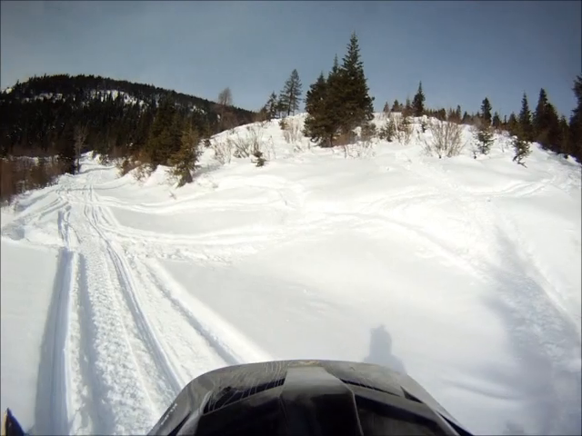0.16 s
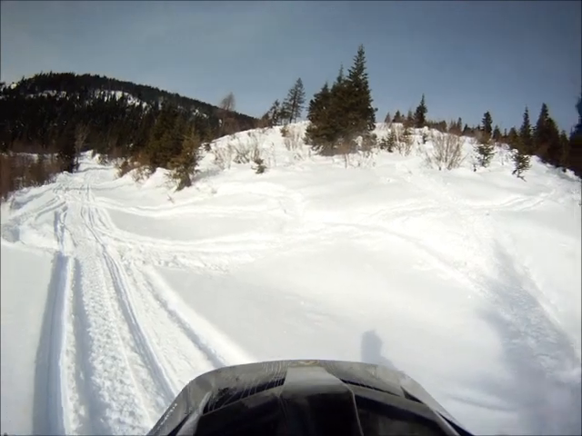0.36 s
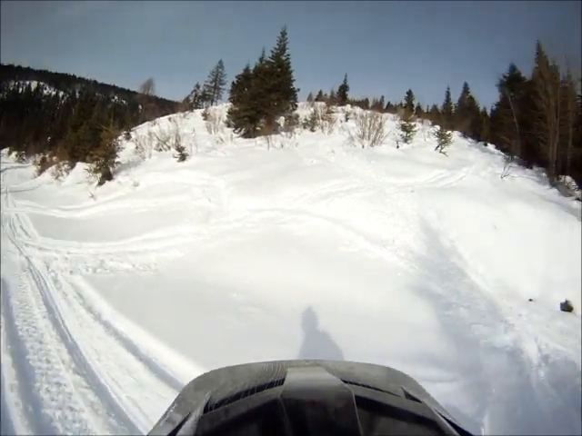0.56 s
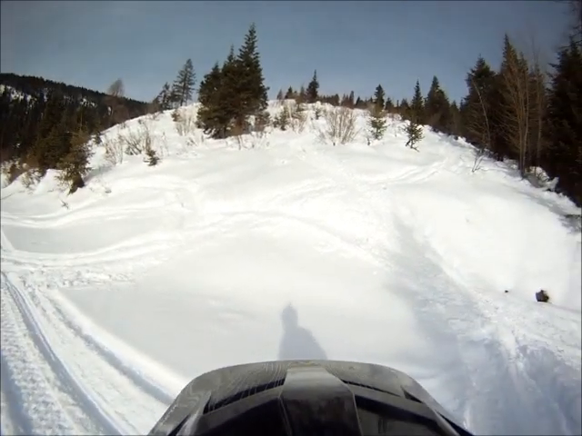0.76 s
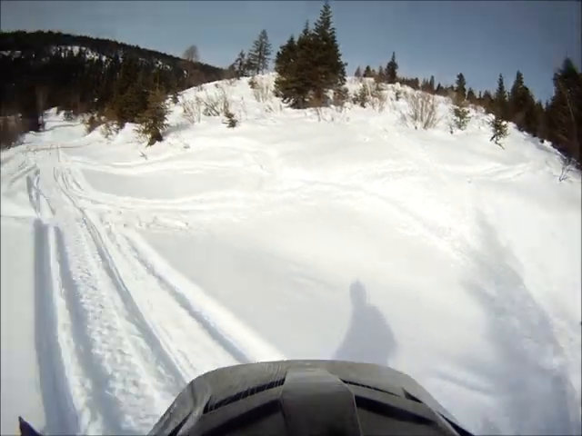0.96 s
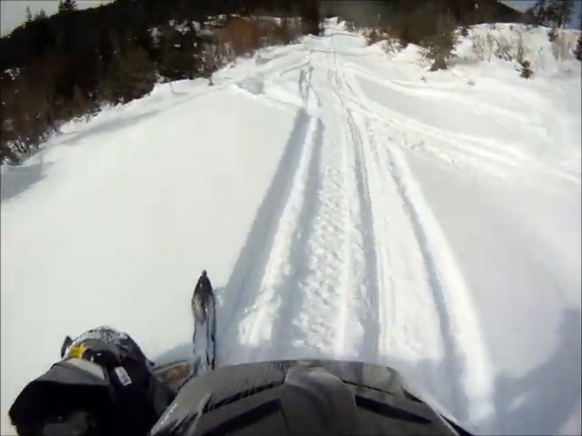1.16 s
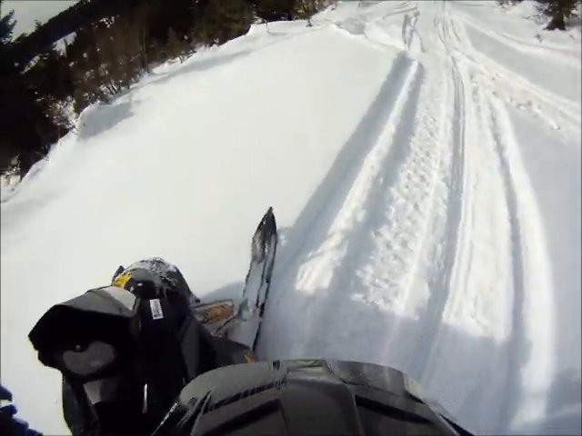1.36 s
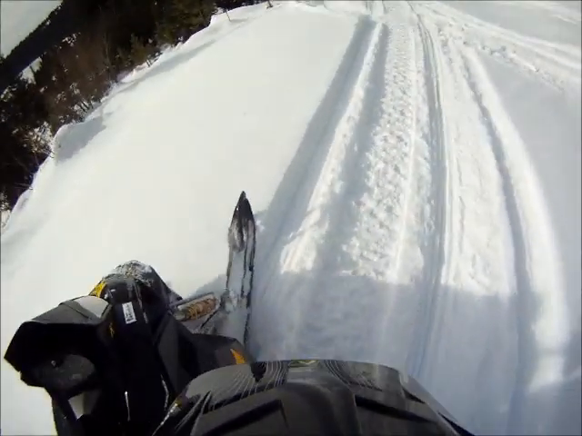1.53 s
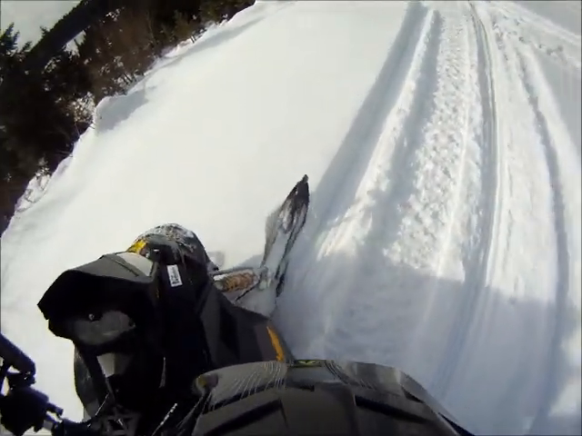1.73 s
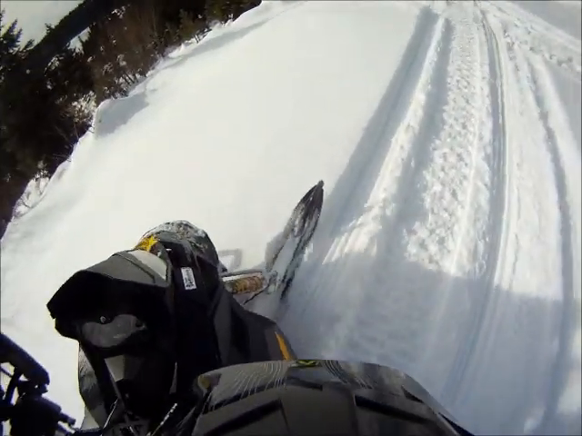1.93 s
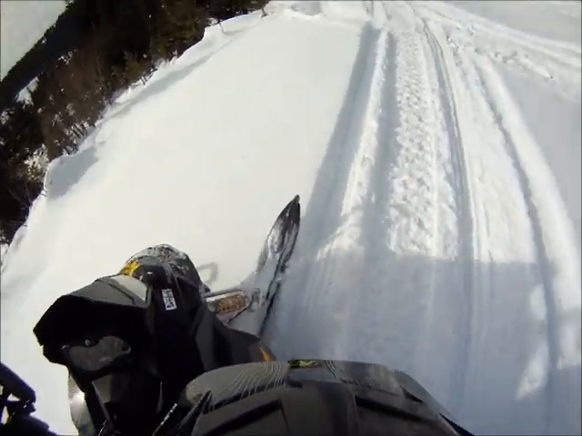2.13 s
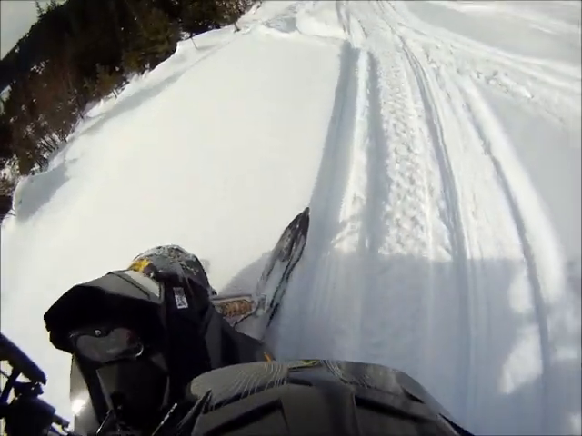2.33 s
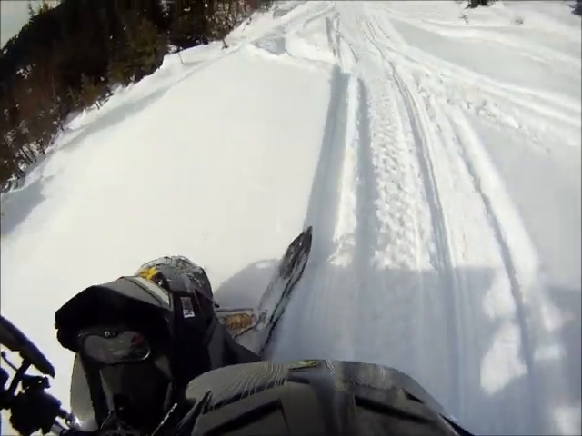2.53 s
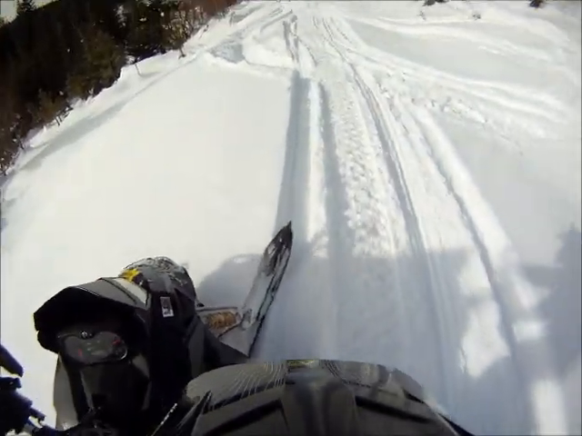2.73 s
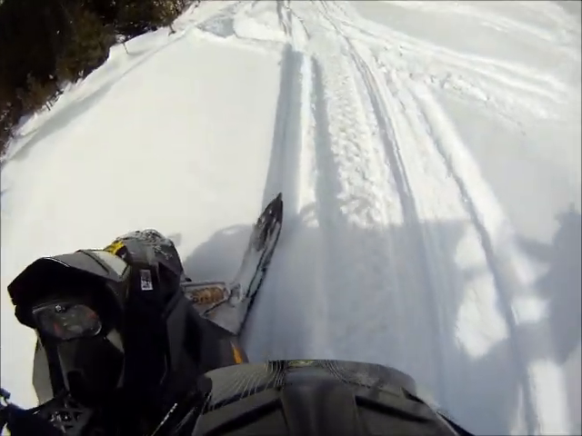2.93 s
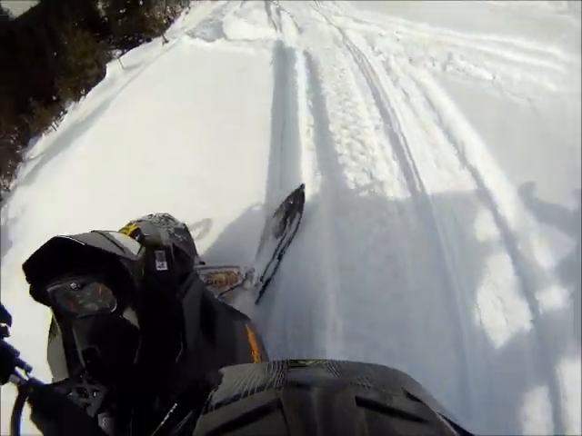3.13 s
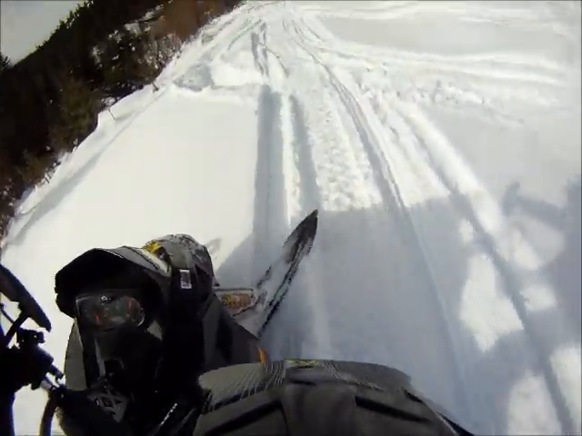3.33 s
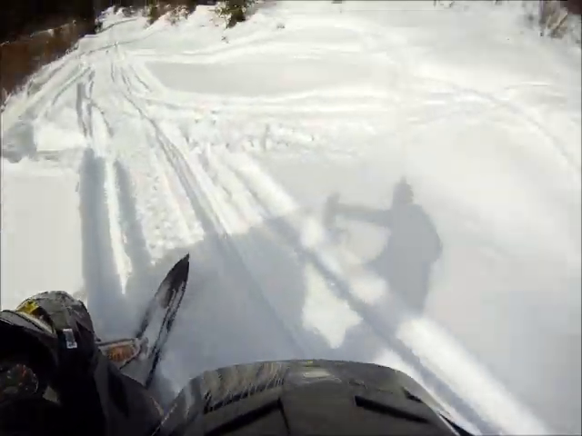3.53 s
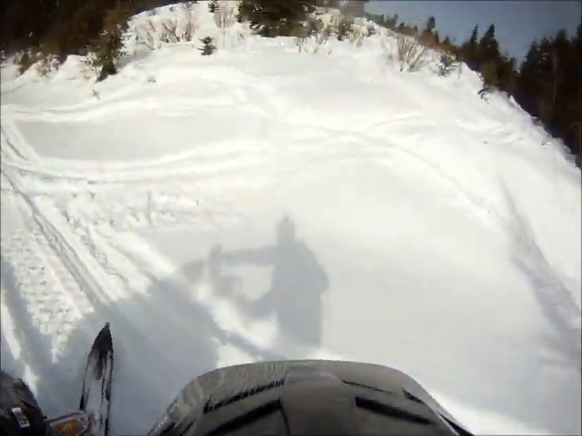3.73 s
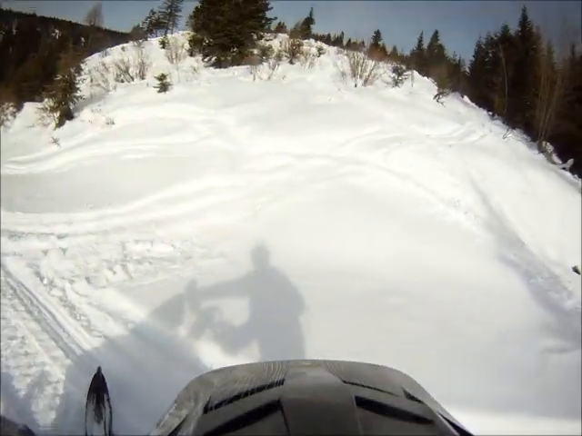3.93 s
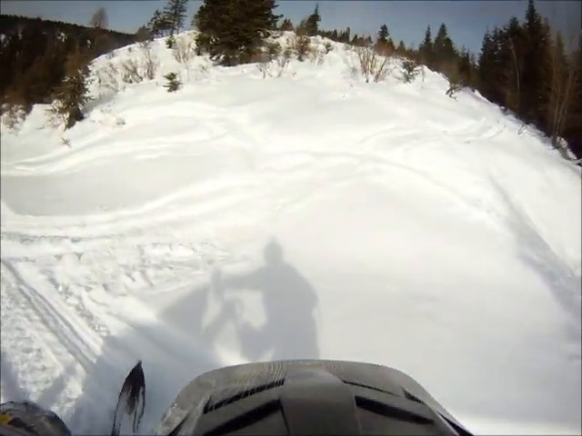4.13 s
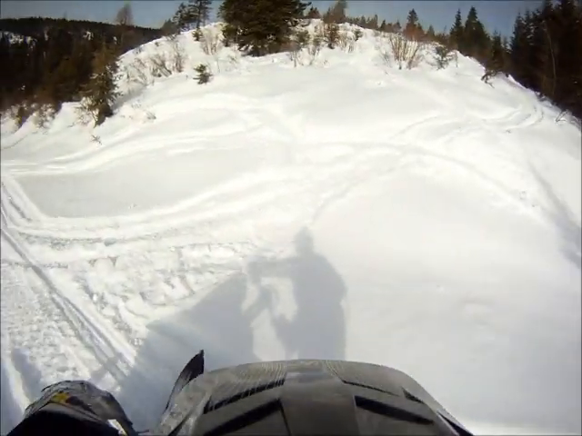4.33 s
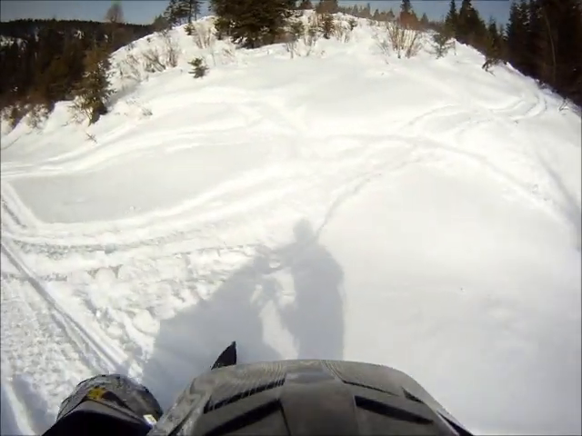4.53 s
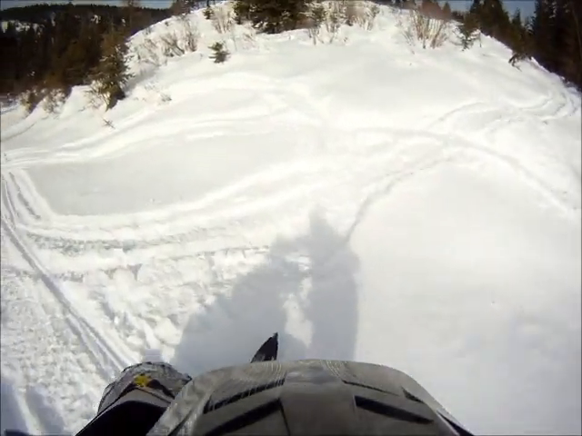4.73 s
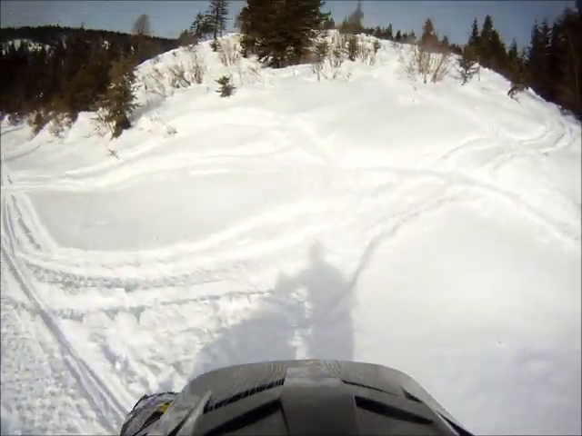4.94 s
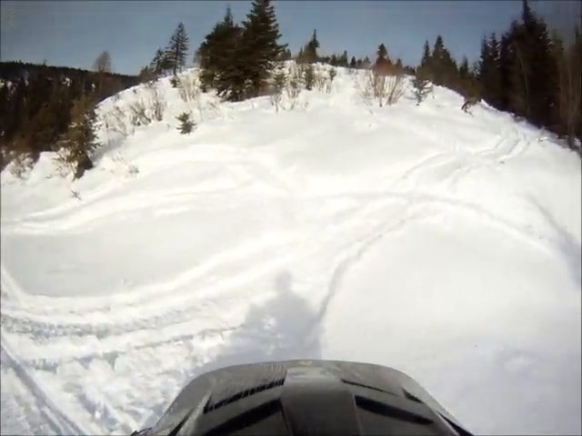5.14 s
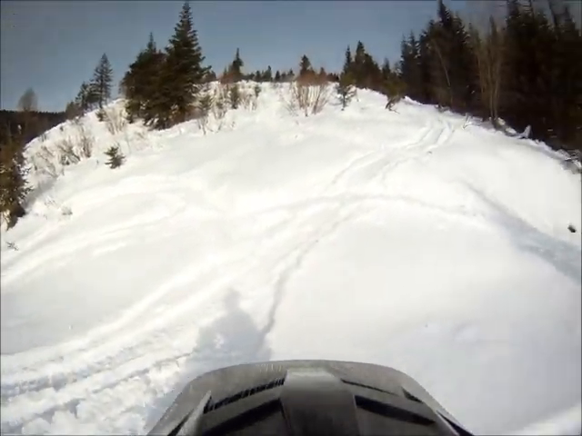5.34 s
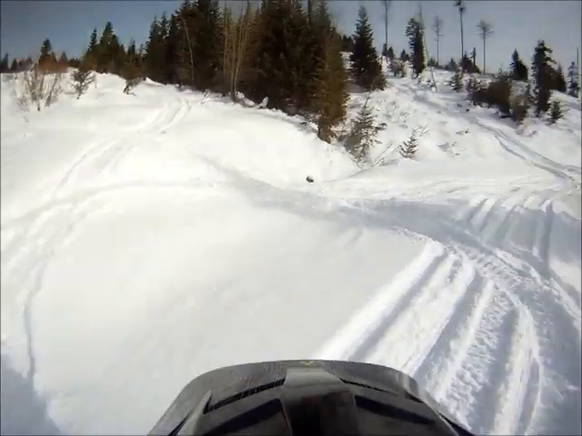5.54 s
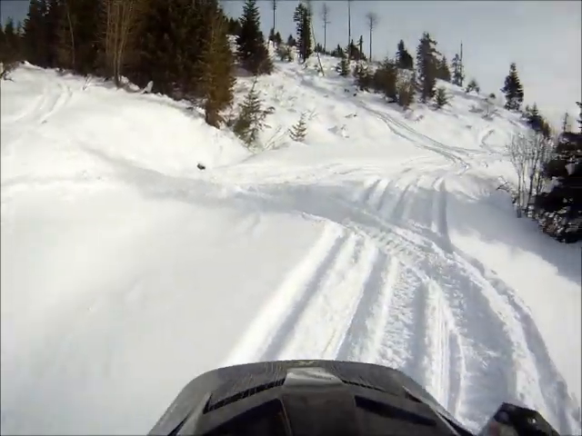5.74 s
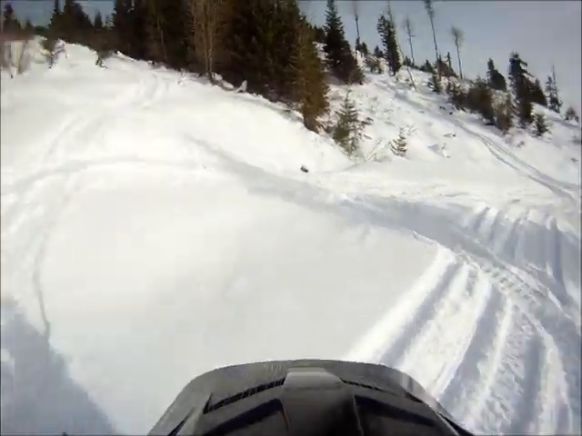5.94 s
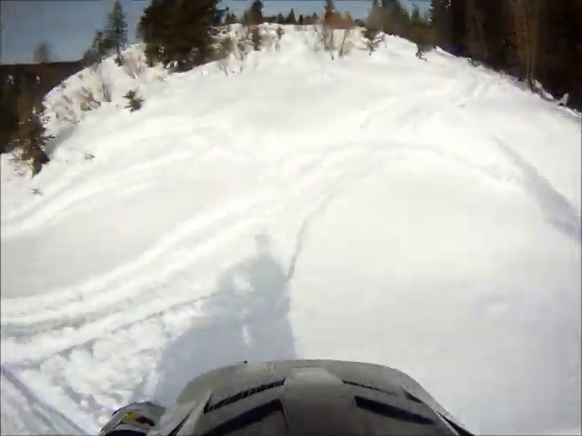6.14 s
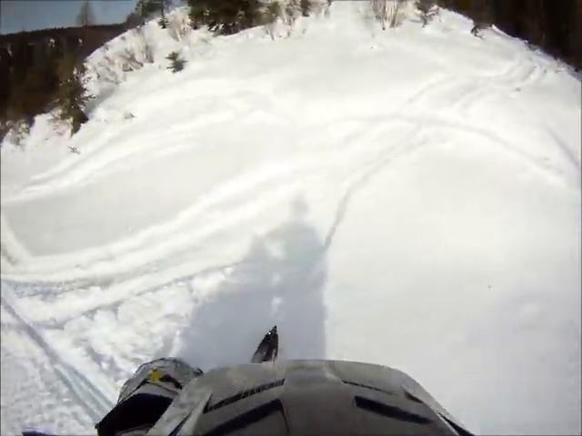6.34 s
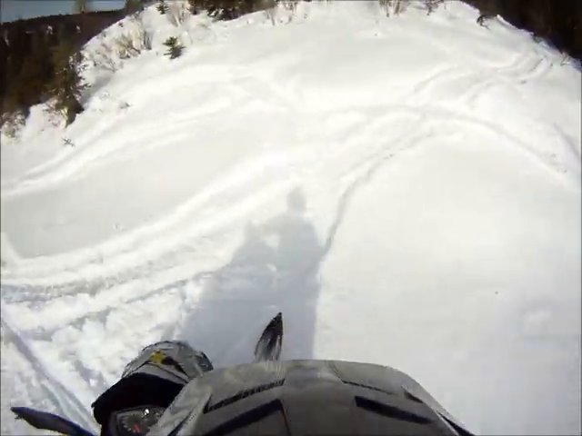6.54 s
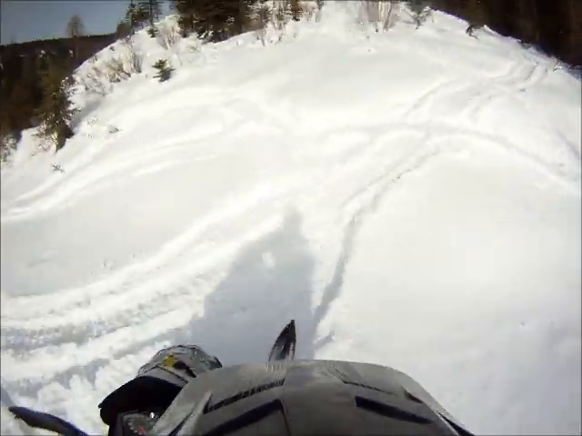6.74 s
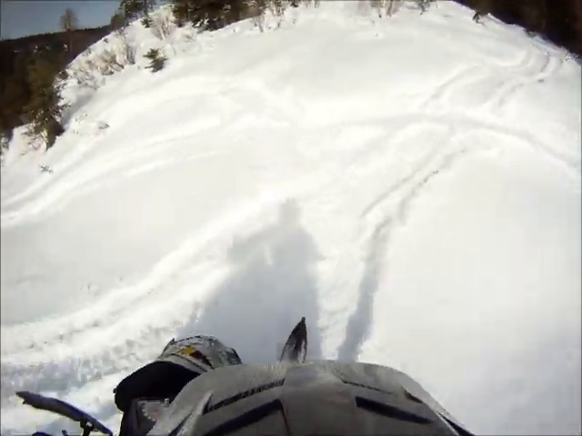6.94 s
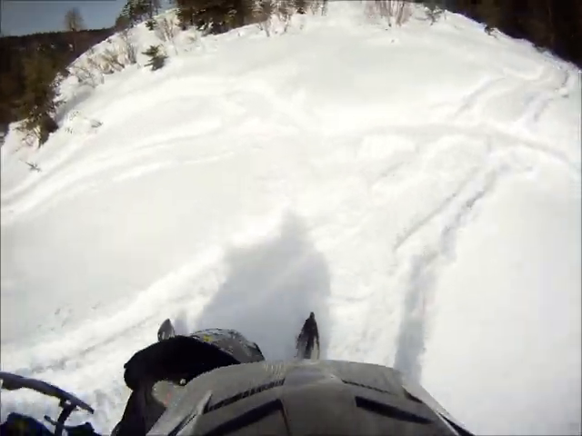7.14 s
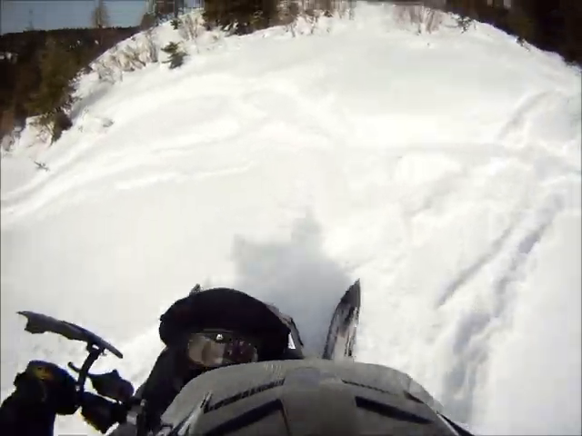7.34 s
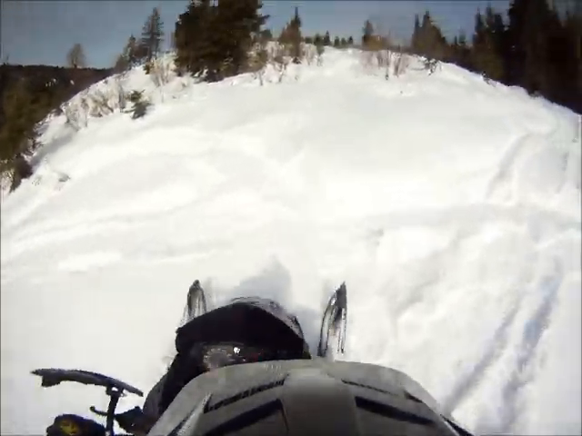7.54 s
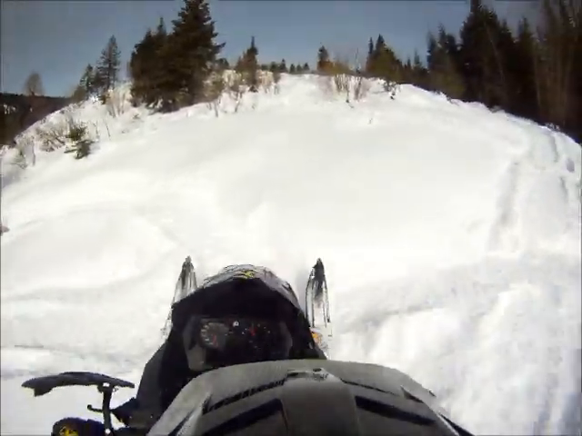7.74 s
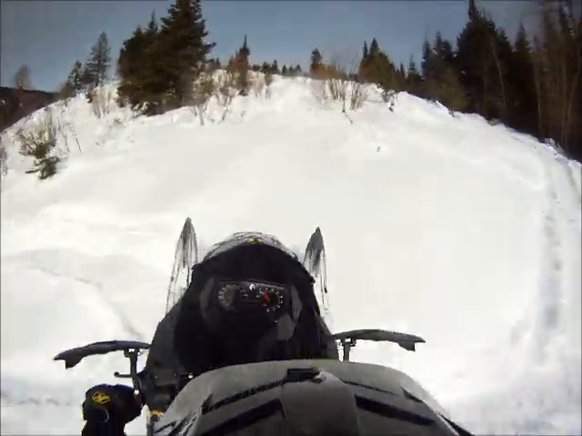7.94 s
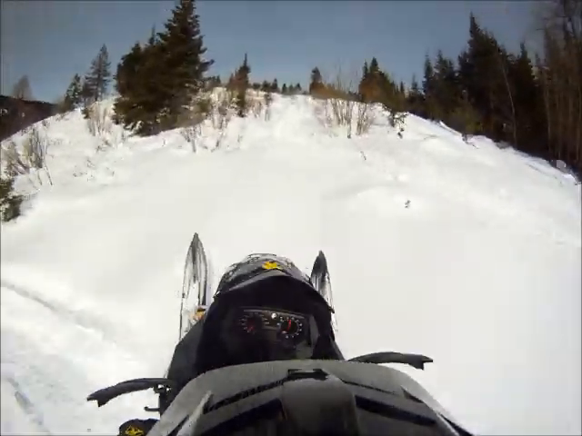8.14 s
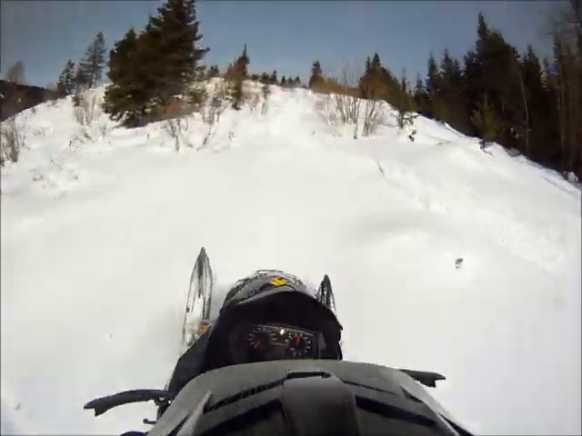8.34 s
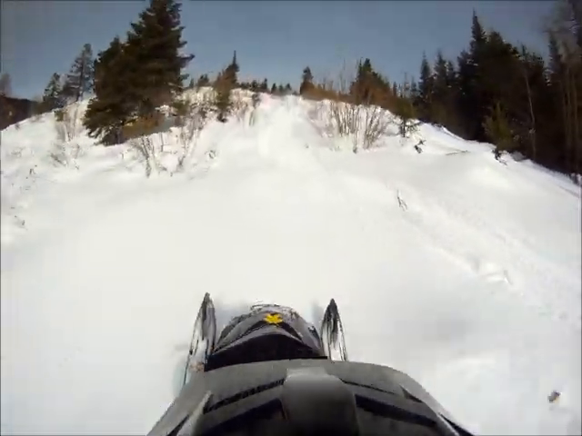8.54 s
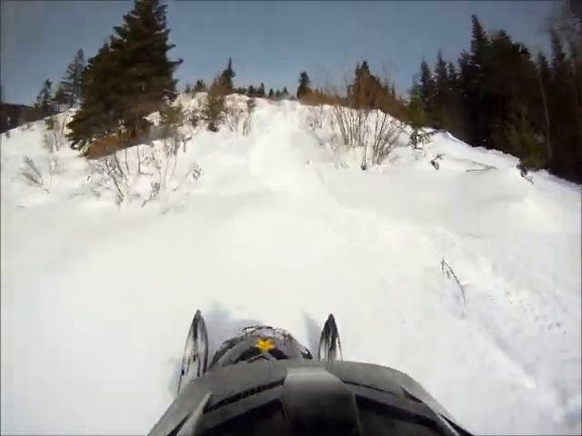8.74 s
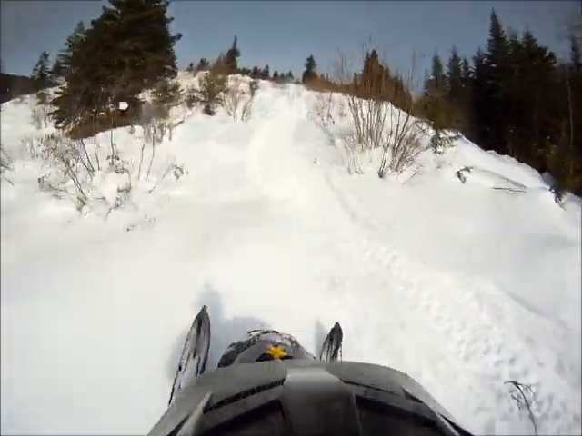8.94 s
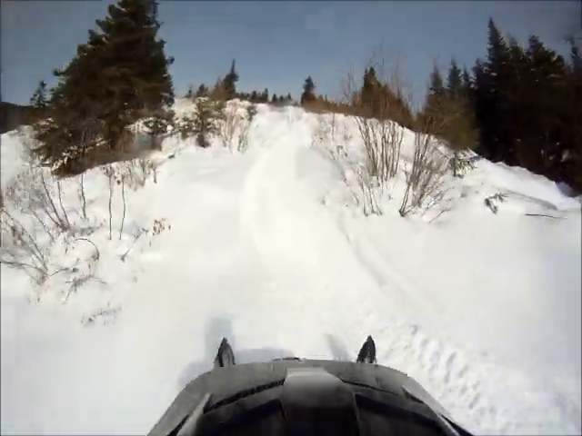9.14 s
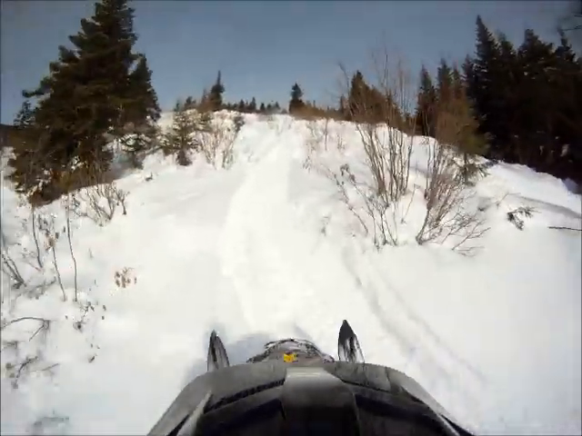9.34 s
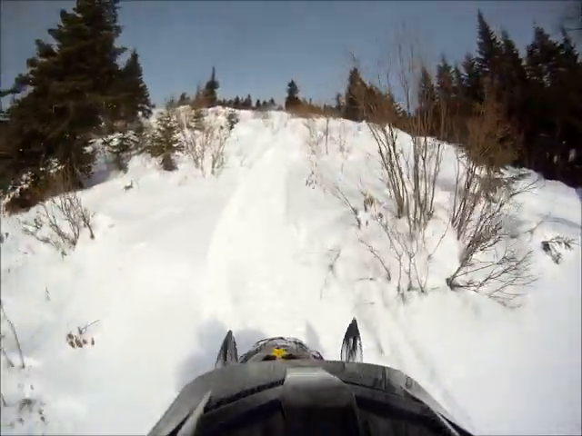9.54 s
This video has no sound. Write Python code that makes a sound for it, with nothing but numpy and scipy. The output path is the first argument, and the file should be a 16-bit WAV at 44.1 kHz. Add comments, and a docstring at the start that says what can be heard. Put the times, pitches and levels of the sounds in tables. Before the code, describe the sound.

Close over the hood, a snowmobile engine putters and pops, swishes over snow, then revs in repeated buzzing bursts that grow higher and more insistent.

```python
"""First a snowmobile coasting in through soft snow, popping softly, then surge after surge of the throttle.
The microphone is in a small camera on the rider, close above the hood and facing ahead, later down to it.
Nearest is the clatter of engine and belt drive, partials and noise bursts locked to the firings of a two-stroke twin.
The exhaust hums and barks in filtered firing harmonics and misfires in pressure pulses; filtered noise makes the
ski swishes, rumble and drone. The camera's coarse sampling adds a thin metallic sheen."""
import sys
import numpy as np
from scipy import signal
from scipy.fft import rfft, irfft, next_fast_len
from scipy.io import wavfile
from scipy.ndimage import uniform_filter1d

SR = 44100
rng = np.random.default_rng(int(sys.argv[2]) if len(sys.argv) > 2 else 0)


def master(y):
    """Save y as 16-bit WAV."""
    cut = np.clip(np.atleast_2d(y).T, -1, 1)
    pcm = np.round(cut * 32767)  # scale
    wavfile.write(sys.argv[1], SR, pcm.astype(np.int16))


N = 422914
T = np.arange(N) / SR
MID_HZ = 170  # firing rate at which the level laws of the engine parts are stated


def undb(db):
    """Decibels to gain."""
    return 10 ** (np.asarray(db) / 20)


def unit(x):
    """Scale to rms 1."""
    return x / np.sqrt(np.mean(x ** 2))


def curves(table):
    """Each column of a timed table, sample by sample."""
    s, *columns = np.transpose(table)
    return [np.interp(T, s, c) for c in columns]


def shape(points, hz):
    """Gain of a (Hz, dB) spectrum at the given frequencies."""
    f, db = np.transpose(points)
    return undb(np.interp(np.log(hz + 1), np.log(f), db))


def colour(x, response):
    """Filter by a gain that depends on frequency."""
    size = next_fast_len(N + 4096)
    f = np.arange(size // 2 + 1) * SR / size
    return irfft(rfft(x, size) * response(f), size)[:N]


def walk(rate):
    """Random wander of spread 1: straight lines between `rate` random points a second."""
    knots = rng.standard_normal(4096)
    return np.sqrt(3 / 2) * np.interp(T * rate, np.arange(len(knots)), knots)


def partial(order, cycles, waver_db, slip, rate):
    """One multiple of the firing rate, wavering in strength and slipping in phase (cycles)."""
    phase = order * cycles + rng.random() + slip * walk(rate)
    return undb(waver_db * walk(rate)) * np.sin(2 * np.pi * phase)


# Low rumble of the track and of air on the microphone.
# Each row: frequency in Hz, relative level per Hz in dB.
RUMBLE_SPECTRUM = [(20, 4.5), (50, 0.5), (90, 3.5), (170, 4.5), (260, -29), (800, -33.5)]


def rumble(hz, db=-46, rise_db=3):
    """Track and air rumble: unsteady filtered noise, growing with each octave of revs."""
    noise = unit(colour(rng.standard_normal(N), lambda f: shape(RUMBLE_SPECTRUM, f)))
    return noise * undb(db + rise_db * np.log2(hz / 150) + 2 * walk(23))


def drone(hz, centre_hz=89, width_hz=24, db=-51, rise_db=7):
    """Low boom of the chassis: a narrow band of noise that grows with each octave of revs."""
    noise = rng.standard_normal(N)
    boom = unit(colour(noise, lambda f: 1 / (1 + (2 * (f - centre_hz) / width_hz) ** 4)))
    return boom * undb(db + rise_db * np.log2(hz / MID_HZ))


# Skis brushing the snow, low down ahead of the microphone.
# Each row: centre in seconds, half length in seconds, centre frequency in Hz, level in dB.
SKI_SWISHES = [(0.266, 0.026, 2410, -39), (0.351, 0.013, 2500, -36), (0.45, 0.065, 2350, -42.5),
               (1.052, 0.034, 2530, -44.5), (5.546, 0.063, 2507, -42.5), (5.69, 0.012, 2650, -43)]


def skis(width_hz=1700, edge_hz=2780):
    """Snow under the skis: short swells of grainy band-limited noise."""
    out = 0
    for s, half, centre_hz, db in SKI_SWISHES:

        def band(f):
            peak = 1 / (1 + (2 * (f - centre_hz) / width_hz) ** 2)
            return peak / (1 + (f / edge_hz) ** 20)

        grains = rng.standard_normal(N) * undb(1.9 * walk(300))
        swell = np.exp(-((T - s) / half) ** 2 / 2)
        out = out + undb(db) * unit(colour(grains, band)) * swell
    return out


# Pushes of the throttle; the firing rate is two firings a crank turn, levels hold at MID_HZ before drift and flares.
# Each row: opens in seconds, shuts in seconds, firing rate at opening in Hz, rate at shutting in Hz,
# easing of the climb (1 = straight), time constant of the coast before it in seconds, squeeze time in seconds,
# throttle kept afterwards 0-1, clatter in dB, exhaust hum (fundamental) in dB, exhaust bark (overtones) in dB.
THROTTLE_PUSHES = [(1.334, 1.578, 90.17, 172.3, 1.08, 1.35, 0.019, 0.69, -24.5, -32.5, -29.5),
                   (1.809, 1.984, 156, 191.6, 0.92, 0.4, 0.05, 0.24, -25, -35.5, -33.5),
                   (2.815, 3.142, 118.1, 201.3, 0.97, 0.31, 0.21, 0.059, -26, -34, -34),
                   (3.935, 4.178, 121.5, 183.5, 1.03, 0.31, 0.13, 0, -28.5, -35.5, -37),
                   (5.588, 5.78, 106.8, 132, 1.02, 0.4, 0.052, 0.49, -31.5, -35, -39.5),
                   (5.905, 6.16, 125.8, 153.9, 1.7, 0.3, 0.073, 0.92, -30.5, -34.5, -39),
                   (6.19, 6.732, 154.6, 192.7, 2.3, 0.3, 0.056, 0.05, -29.5, -38, -42.5),
                   (7.13, 7.883, 148.5, 265, 1.79, 0.28, 0.17, 0.0018, -26, -36, -37.5),
                   (8.16, 8.602, 196.4, 272.3, 1.16, 0.25, 0.32, 0.57, -27, -34, -33),
                   (8.802, 8.901, 218.7, 225.1, 0.98, 0.3617, 0.03, 0.032, -27.5, -29.5, -35.5),
                   (9.042, 9.309, 205.7, 273.4, 1.14, 0.24, 0.17, 0, -26.5, -30.5, -40),
                   (9.478, 9.599, 215.8, 237, 1.04, 0.41, 0.011, 0, -27, -38, -32)]
START_HZ = 120.88  # firing rate at the start of the first coast
RELEASE_S = .033  # the throttle springs shut


def revs():
    """Firing rate: it climbs while the throttle is open and sinks, fast at first, once it is shut."""
    hz, last_s, last_hz = np.zeros(N), 0, START_HZ
    for opens, shuts, from_hz, top_hz, easing, coast_s, *_ in THROTTLE_PUSHES:
        fall = np.expm1(-np.clip(T - last_s, 0, None) / coast_s)
        sunk = fall / np.expm1((last_s - opens) / coast_s)
        hz = np.where(T >= last_s, last_hz + (from_hz - last_hz) * sunk, hz)
        to_go = np.interp(T, [opens, shuts], [1, 0]) ** easing
        hz = np.where(T >= opens, top_hz + (from_hz - top_hz) * to_go, hz)
        last_s, last_hz = shuts, top_hz
    return uniform_filter1d(hz, size=1323)  # 30 ms


def throttle(lag=1):
    """Throttle 0-1 (squeeze, hold, release) and the three levels of the current push; lag scales the squeeze."""
    knots, rest, before = [], 0, THROTTLE_PUSHES[0][-3:]
    for opens, shuts, _, _, _, _, squeeze_s, kept, *levels in THROTTLE_PUSHES:
        full = min(opens + lag * squeeze_s, shuts)
        knots += [
            (opens, rest, *before),
            (full, 1, *levels),
            (shuts, 1, *levels),
            (shuts + RELEASE_S, kept, *levels),
        ]
        rest, before = kept, levels
    return curves(knots)


def effort(hz, opening, pull_db, pull_octave_db, coast_db, coast_octave_db):
    """Level of an engine part: it grows with each octave of revs, by one law coasting and another pulling."""
    octaves = np.log2(hz / MID_HZ)
    pulling = pull_db + pull_octave_db * octaves
    coasting = coast_db + coast_octave_db * octaves
    return opening * pulling + (1 - opening) * coasting


def pop(ring, push_s=.0011, ring_hz=168, decay_s=0.029):
    """One suck and push of pressure, then the silencer rings briefly."""
    t = np.arange(4096) / SR - np.pi * push_s
    gulp = t / push_s * np.exp((1 - (t / push_s) ** 2) / 2)
    ringing = (t > 0) * np.sin(2 * np.pi * ring_hz * t) * np.exp(-np.abs(t) / decay_s)
    return gulp + ring * ringing


def soft_pops(opening, gap_s=0.32, db=-38, spread_db=3):
    """Kicks of the faint pops, at loose intervals, as unburnt fuel gathers off the throttle."""
    gaps, sizes = rng.standard_normal((200, 2)).T
    at = (np.cumsum(gap_s * np.exp(0.37 * gaps)) * SR).astype(int)
    kicks = np.zeros(N)
    kicks[at[at < N]] = undb(db + spread_db * sizes[at < N])
    return kicks * (1 - opening)


# The loudest late firings that pop in the pipe.
# Each row: time in seconds, relative level in dB.
LOUD_POPS = [(0.247, -34.5), (0.329, -29.5), (0.593, -31.5), (0.799, -31), (1.091, -28), (1.123, -27),
             (1.23, -32), (1.632, -23), (1.727, -17), (2.185, -23), (2.295, -26), (2.414, -27),
             (2.639, -22), (2.772, -26), (2.844, -23.5), (3.16, -19), (3.386, -21), (3.482, -24.5),
             (3.567, -29.5), (4.24, -23.5), (4.325, -26.5), (4.53, -29), (4.652, -31), (4.768, -30.5),
             (5.155, -32), (5.279, -32), (5.765, -28), (6.851, -28), (6.925, -24)]


def misfires(hz, cycles, clatter_db, opening, pop_db=-3.5, burble_db=-28, follow=0.5, spread_db=3.0,
             clean_hz=215, lead_s=0.0023, hollow=1.0, pulling_db=-8):
    """Loud and soft pops, and a hollow burble of uneven firings that clears as the engine pulls and revs high."""
    firings = np.flatnonzero(np.diff(cycles.astype(int)))
    charge_db = spread_db * np.minimum(rng.exponential(size=len(firings)), 4)
    uneven = np.zeros(N)
    uneven[firings] = undb(charge_db) - undb(spread_db)
    level_db = burble_db + follow * clatter_db + pulling_db * opening
    uneven *= undb(level_db) / (1 + (hz / clean_hz) ** 10)
    late = soft_pops(opening)
    for s, db in LOUD_POPS:
        # started early, so the suck of pressure falls on the listed time
        late[int((s - lead_s) * SR)] += undb(db + pop_db)
    pops = signal.fftconvolve(late, pop(ring=0.42))
    burble = signal.fftconvolve(uneven, pop(ring=hollow))
    return (pops + burble)[:N]


def blowdown(cycles, opening, bark_db, db=-7, fall_db=0.7, ring_hz=1090, width_hz=170, ring_db=11, count=11):
    """Under load each firing leaves the port as a sharp pulse that rings the header: a rasp of upper harmonics."""
    pulse = 0
    for order in np.arange(3, count):
        gain = undb(1.1 * walk(30) - fall_db * order)
        pulse = pulse + gain * np.cos(2 * np.pi * order * cycles)
    rung = colour(pulse, lambda f: undb(ring_db / (1 + (2 * (f - ring_hz) / width_hz) ** 2)))
    return -opening * undb(bark_db + db) * unit(rung)


# What the silencer lets through.
# Each row: frequency in Hz, relative gain in dB.
SILENCER = [(60, -37), (90, 6), (130, 2), (168, 7), (215, -17.5), (270, -8), (330, -7), (470, 1), (535, -2),
            (590, -5.5), (660, -5.5), (760, -15.5), (1100, -42)]
# Exhaust overtones; the halves come from unequal cylinders.
# Each row: multiple of the firing rate, relative level in dB.
EXHAUST_OVERTONES = [(.5, -13), (1.5, -6.5), (2, 9.5), (2.5, -7), (3, 4.5), (3.5, -7.5), (4, -5)]
# above this rate it fires evenly even off the throttle; width of the change below it
STEADY_FROM_HZ, STEADY_SPAN_HZ = 194, 60


def exhaust(hz, cycles, opening, hum_db, bark_db, waver_db=2.35, coast_waver_db=3, gas_db=-15,
            coast_gas_db=3, resonant=0.31):
    """Firing harmonics through the silencer, steadier under load and more uneven when coasting."""
    coasting = (1 - opening) * np.clip((STEADY_FROM_HZ - hz) / STEADY_SPAN_HZ, 0, 1)
    hum_waver_db = waver_db + coast_waver_db * coasting
    hum = np.sqrt(2) * partial(0.99, cycles, hum_waver_db, slip=0.018, rate=45)
    overtones, power = 0, 0
    for order, db in EXHAUST_OVERTONES:
        gain = undb(db) * shape(SILENCER, order * hz)
        overtones = overtones + gain * partial(order, cycles, waver_db, slip=0.026, rate=44)
        power = power + gain ** 2 / 2

    def gas_colour(f):
        low_cut = f ** 2 / (f ** 2 + 60 ** 2)
        return shape(SILENCER, f) * low_cut / (1 + (f / 900) ** 4)

    # turbulent gas leaves the pipe in one puff a firing
    puffs = rng.standard_normal(N) * (1 + np.cos(2 * np.pi * cycles))
    gas = undb(gas_db + coast_gas_db * coasting) * unit(colour(puffs, gas_colour))
    # the bark swells where its overtones meet the resonances of the pipe
    swell = (power / np.mean(power)) ** (resonant / 2)
    bark = swell * overtones / np.sqrt(power) + gas
    return undb(hum_db) * hum + undb(bark_db) * bark


def knocks(cycles, at_s=8.38, half_s=0.025, db=-3.5, ring_hz=1600, decay_s=0.00055):
    """One short run of hard, quickly damped knocks under load, one a crank turn."""
    t = np.arange(512) / SR
    crank_turns = (cycles / 2).astype(int)
    hits = np.diff(crank_turns, prepend=0) * np.exp(-((T - at_s) / half_s) ** 2 / 2)
    knock = np.sin(2 * np.pi * ring_hz * t) * np.exp(-t / decay_s)
    return undb(db) * signal.fftconvolve(hits, knock)[:N]


# Slow drift of the clatter as the rider, and the microphone, shifts over the hood.
# Each row: time in seconds, level change in dB.
LEAN_OVER_HOOD = [(0, -1.6), (.93, -3.5), (1.1, 2.6), (1.5, -1), (3.1, 1), (3.8, -2), (4.8, -0.1),
                  (5.4, -2.5), (6.4, 0), (9.58, -2)]


def lean():
    """Drift of the clatter level in dB, straight from one position of the rider to the next."""
    return curves(LEAN_OVER_HOOD)[0]


# The clatter flares up briefly.
# Each row: centre in seconds, half length in seconds, lift in dB.
CLATTER_FLARES = [(1.93, 0.024, 1.5), (3.269, 0.023, 2.5), (6.284, 0.026, 3), (6.647, 0.041, 3),
                  (7.43, 0.048, 2), (7.62, 0.091, 1.5), (8.162, .015, 6), (8.366, 0.051, 3),
                  (9.162, .035, 3), (9.495, 0.0054, 3.5)]


def flares():
    """Lift of the clatter in dB: each flare is a smooth swell."""
    return sum(db * np.exp(-((T - s) / half) ** 2 / 2) for s, half, db in CLATTER_FLARES)


# Broad colour of the clatter close to the hood.
# Each row: frequency in Hz, relative level per Hz in dB.
HOOD_COLOUR = [(100, -24.5), (480, -9), (620, -17), (940, -20), (1080, -8.5), (2150, -7), (2400, -13),
               (2800, -21), (3050, -19.5), (3780, -18.5), (4150, -29), (5400, -25), (5700, -38.5)]
# Panel and cavity resonances of the hood, and one notch.
# Each row: centre in Hz, width in Hz, lift in dB.
HOOD_RESONANCES = [(688, 27, 9.5), (874.5, 30, 12), (1135, 128, 9.5), (1261, 36, -11), (1430, 68, 10.5),
                   (1658, 48, 3.5), (1795, 128, 7.5), (2041, 54, 7), (3094, 117, 7), (3575, 236, 7.5)]


def hood(hz):
    """Response of the hood: its resonances on a broad hump."""
    lift_db = sum(db / (1 + (2 * (hz - f) / width) ** 2) for f, width, db in HOOD_RESONANCES)
    return shape(HOOD_COLOUR, hz) * undb(lift_db)


# Partials that stand out of the clatter at high revs.
# Each row: multiple of the firing rate, lift in dB.
STANDOUT_PARTIALS = [(4, 5.5), (5, 3.5), (6, 6), (7, 5), (8, 7)]
ORDERS_FROM_HZ, ORDERS_SPAN_HZ = 153, 46.8  # firing rates over which they come out
# The rider and microphone face ahead at first, then turn down to the hood.
# Each row: time in seconds, treble gain in dB.
FACING = [(.95, -2), (1.3, -1)]


def clatter(hz, cycles, db, shimmer_db=4.5, noise_db=-1.5, smoothing_db=-3, knock_decay=0.37,
            scatter_db=1.2, grind=4.7, overrun_db=5, thinning_db=-4, fall_db=0.15):
    """Piston, clutch and belt noise: a pattern that repeats each crank turn, plus a rattling burst a firing."""
    lifts = dict(STANDOUT_PARTIALS)
    racing = np.clip((hz - 150) / 90, 0, 1)
    standing = np.clip((hz - ORDERS_FROM_HZ) / ORDERS_SPAN_HZ, 0, 1)
    pattern = 0
    for order in np.arange(7, 50) / 2:
        gain = undb(standing * lifts.get(order, 0) - fall_db * order)
        pattern = pattern + gain * partial(order, cycles, shimmer_db, slip=0.11, rate=17)
    # steady grinding plus a burst that dies away within each firing, each firing of its own size
    size = undb(scatter_db * rng.standard_normal(4096))[cycles.astype(int)]
    burst = np.exp(-(cycles % 1) / knock_decay)
    rattle = rng.standard_normal(N) * size * (grind + burst)
    # at speed the parts run more regularly, and the tones stand further out
    rattle_db = noise_db + smoothing_db * np.log2(hz / 180)
    # as the revs fall (octaves a second) the drive goes slack and rattles more
    climb = uniform_filter1d(np.gradient(np.log2(hz)) * SR, size=2205)
    rattle_db = rattle_db + overrun_db * np.clip(-climb, 0, 1)
    sound = unit(colour(pattern, hood)) + undb(rattle_db) * unit(colour(rattle, hood))
    # faster, harder contacts put less of their energy into the lower panel resonances
    low = colour(sound, lambda f: 1 / (1 + (f / 1300) ** 10))
    sound = sound + (undb(thinning_db * racing ** 2) - 1) * low
    # the treble is shaded while the rider faces away
    treble = colour(sound, lambda f: 1 - 1 / (1 + (f / 2800) ** 10))
    sound = sound + (undb(curves(FACING)[0]) - 1) * treble
    # evened out over 60 ms, so that db alone sets the level
    return undb(db) * sound / np.sqrt(uniform_filter1d(sound ** 2, size=2646))


def scene():
    """All parts of the sled, driven by the throttle and one slightly unsteady crank."""
    hz = revs()
    # the clatter answers the throttle first; hum and bark build up through the squeeze
    quick, clatter_pull, _, _ = throttle(lag=0.25)
    firm, _, hum_pull, _ = throttle(lag=0.53)
    opening, _, _, bark_pull = throttle()
    clatter_db = effort(hz, quick, clatter_pull, pull_octave_db=18, coast_db=-29.5, coast_octave_db=17.5)
    clatter_db = clatter_db + lean() + flares()
    hum_db = effort(hz, firm, hum_pull, pull_octave_db=8, coast_db=-41.5, coast_octave_db=24.5)
    bark_db = effort(hz, opening, bark_pull, pull_octave_db=21.5, coast_db=-42.5, coast_octave_db=8)
    # running count of firings, two a crank turn
    cycles = np.cumsum(hz * (1 + 0.002503 * walk(60))) / SR
    background = rumble(hz) + drone(hz) + skis()
    pipe = misfires(hz, cycles, clatter_db, opening) + blowdown(cycles, opening, bark_db)
    pipe = pipe + exhaust(hz, cycles, quick, hum_db, bark_db)
    under_hood = knocks(cycles) + clatter(hz, cycles, clatter_db)
    return (background + pipe + under_hood)[None]


def record(dry, coarse_hz=12000, top_hz=15400):
    """The camera holds each coarse sample for four steps, which mirrors the sound faintly into the treble."""
    coarse = signal.resample_poly(dry, coarse_hz, SR, axis=1, window=("kaiser", 4))
    steps = np.repeat(coarse, 4, axis=1)
    held = signal.resample_poly(steps, SR, 4 * coarse_hz, axis=1)[:, :N]
    low_pass = signal.ellip(10, .2, 80, top_hz, fs=SR, output="sos")
    return signal.sosfilt(low_pass, held)


dry = scene()
out = record(dry)
master(out)
```